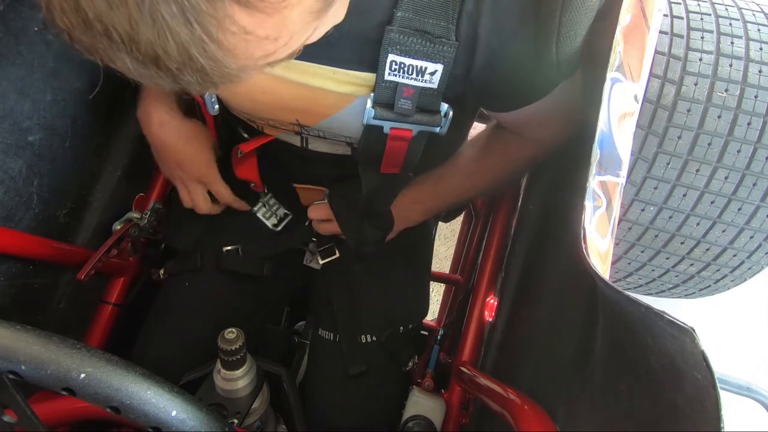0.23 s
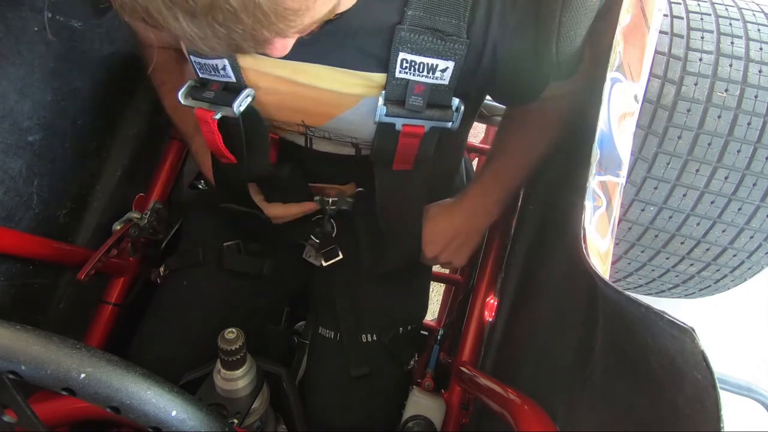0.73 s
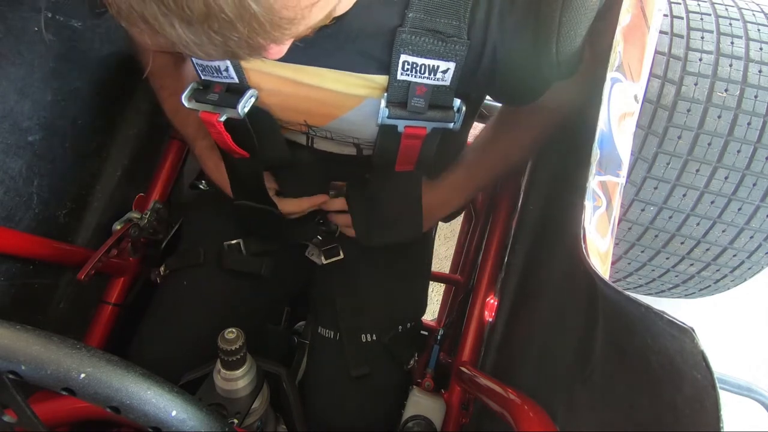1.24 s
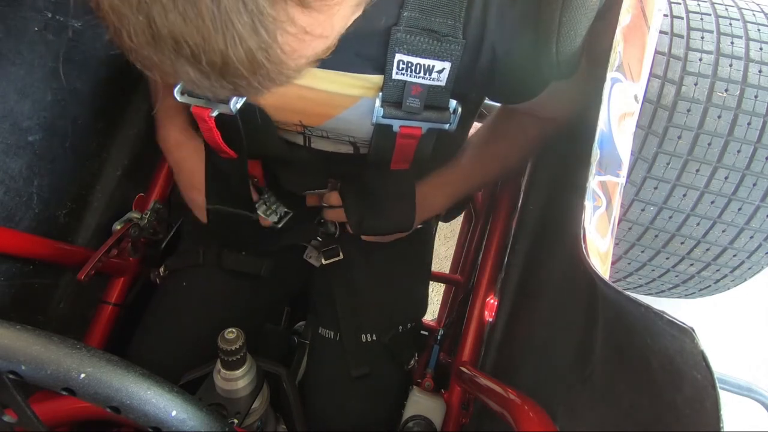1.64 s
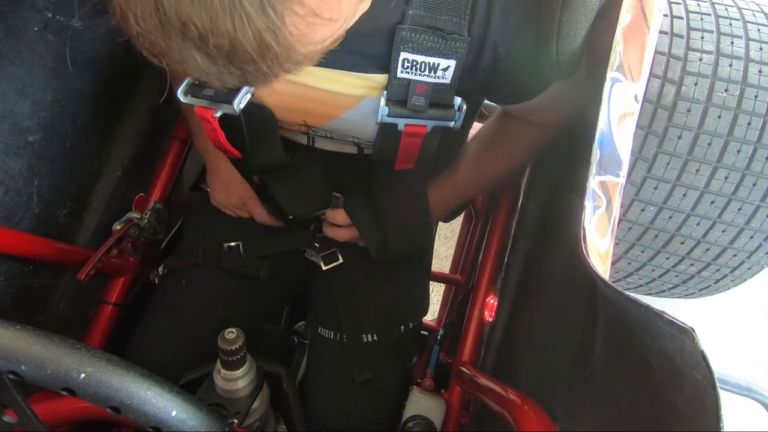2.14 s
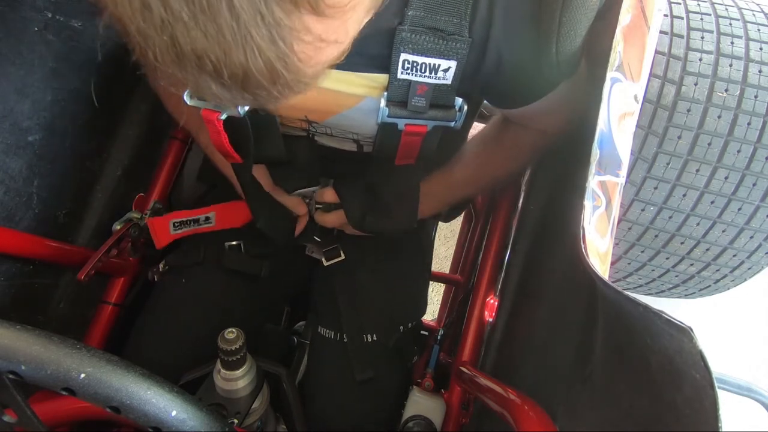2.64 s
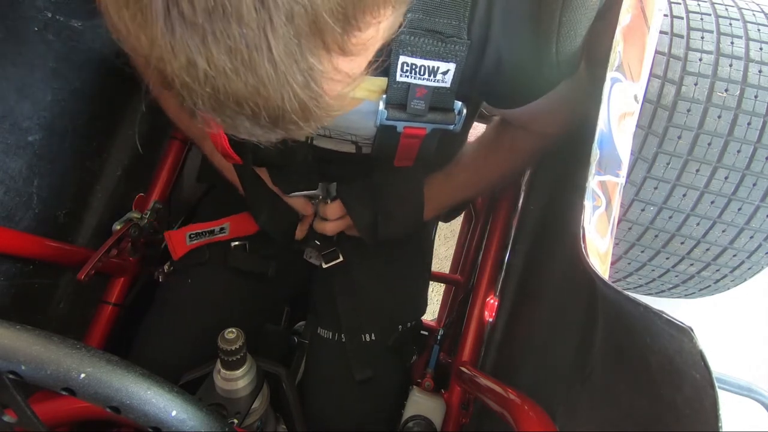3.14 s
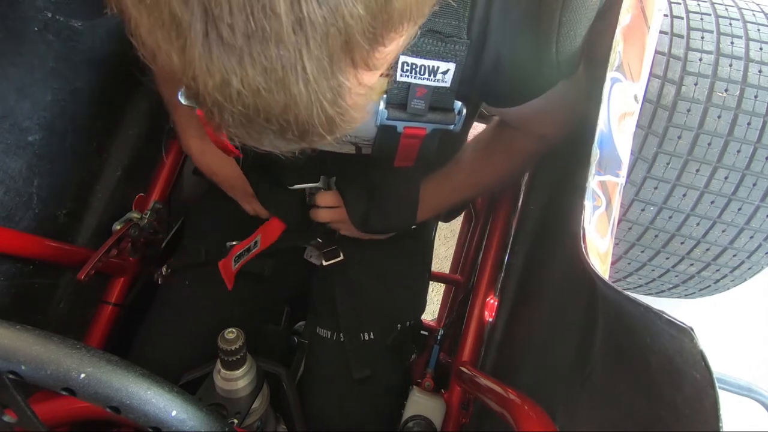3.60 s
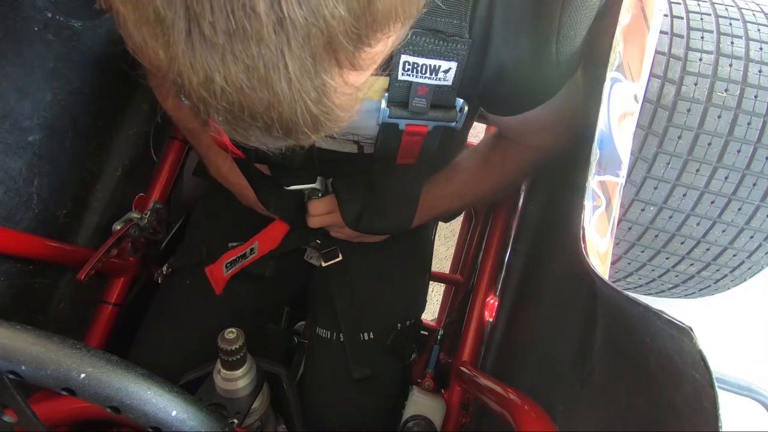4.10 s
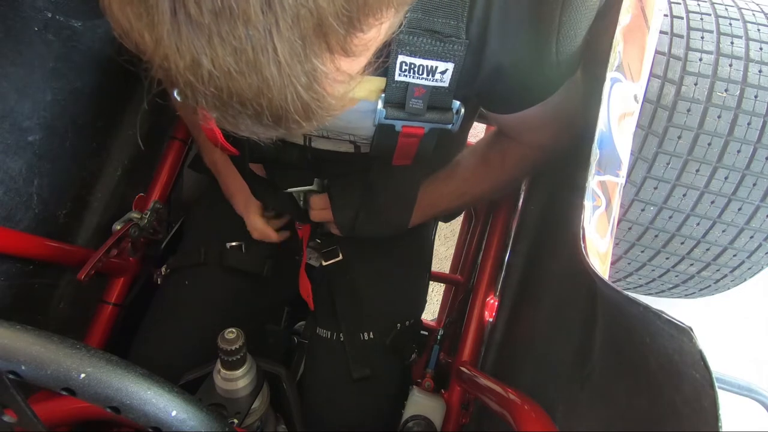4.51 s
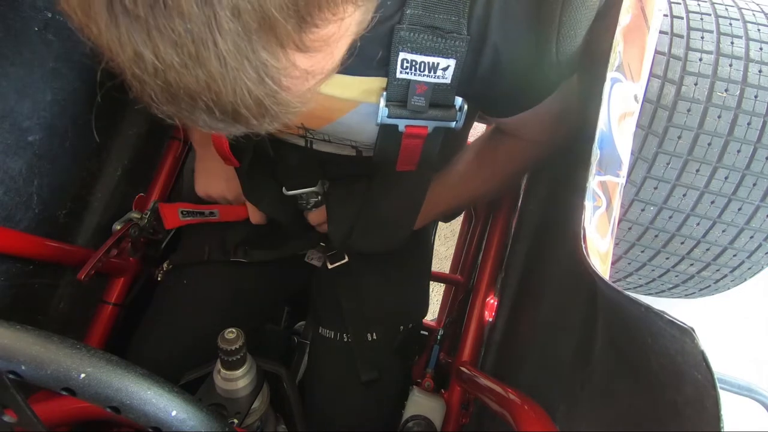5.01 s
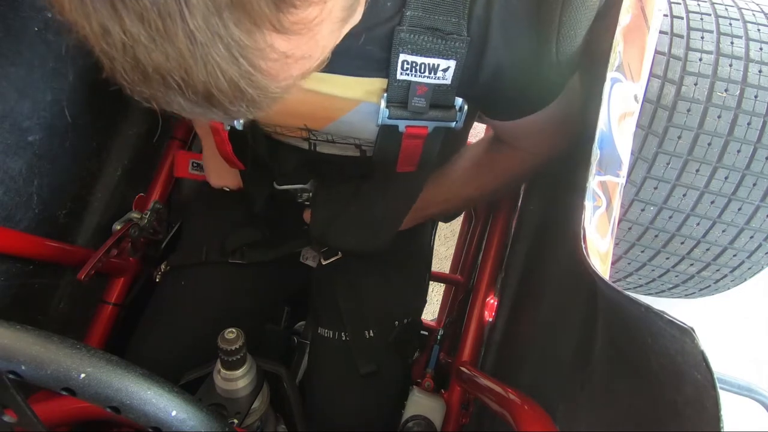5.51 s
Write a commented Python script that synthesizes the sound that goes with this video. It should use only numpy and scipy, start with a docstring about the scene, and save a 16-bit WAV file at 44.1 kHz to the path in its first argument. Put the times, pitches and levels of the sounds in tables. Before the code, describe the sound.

Light, quickly damped metal clicks and clinks come at uneven intervals as the steel ends of a seat harness are hooked into a buckle. Straps rustle against clothing in short pulls, with occasional dull thuds from the seat and a few tiny ticks, before the latch closes with one sharp snap. The microphone is close above the seat of an open buggy, with a faint steady rumble and hiss underneath.

```python
"""A racing harness is fastened in the open cockpit of a buggy, heard almost in mono from above the seat.
From the start, steel tongues and adjusters clink against the buckle, straps rub over clothes
and the seat takes a few dull knocks. Near the middle come tiny dry ticks and the hardest knocks.
At about 5.5 s the lever of the latch snaps shut. Faint air noise lies under it all."""
import sys
import numpy as np
from scipy import signal
from scipy.fft import rfft, irfft
from scipy.io import wavfile

SR = 44100
rng = np.random.default_rng(int(sys.argv[2]) if len(sys.argv) > 2 else 0)


def transcribe(u):
    """Save the signal u as a 16-bit wav file named by the first command-line argument.

    u: samples, shape (n,) or (channels, n), limited to [-1, 1]; the rate is SR.
    q: integer samples, one column per channel.
    """
    v = np.clip(np.atleast_2d(u).T, -1, 1)
    q = np.round(v * 32767).astype(np.int16)
    wavfile.write(sys.argv[1], SR, q)


N = 253575

# the tones (modes) at which the steel tongues and adjusters ring: f/Hz, level/dB
STEEL_TONES = [(800, -2), (1100, 1.5), (1260, -5), (1570, -3), (2340, -4), (3060, -2), (3480, -4.5),
               (3950, -1), (4750, -1), (5730, -4.5), (6280, -9), (7650, -4), (9090, -6.5), (11400, -7.5),
               (15350, -5)]
EDGES = np.geomspace(90, 17000, 21)   # borders of 20 noise bands, f/Hz
CENTRES = np.sqrt(EDGES[1:] * EDGES[:-1])
AGE = np.arange(SR // 3) / SR   # time since a hit, t/s
STEEL_MIDDLE_HZ = 2900   # the steel's sound is shaped around this pitch


def clinks(bands, hold_s=0.00095, clack_t60=0.037, ring_t60=0.042, linger_t60=0.5):
    """Hand-held steel hits steel: a short clack that holds briefly before it fades, and a quickly damped ring."""
    # t/s, clack level/dB, brightness/(dB per octave), louder part f/Hz, other part f/Hz, ring level/dB
    contacts = [(0.008, -42.5, 0.5, 6280, 9090, -47.5), (0.066, -51.5, -6, 2340, 6280, -52.5),
                (0.4691, -39, 0.2, 3950, 5700, -39.5), (0.839, -35, 4, 4750, 7650, -42),
                (0.864, -39.5, 2.3, 9090, 15350, -38), (0.943, -45, 2, 4750, 3950, -50),
                (1.3112, -47.5, 1, 4750, 2340, -52), (1.428, -58, 0, 1570, 1270, -54.5),
                (1.762, -49, -0.5, 1260, 3060, -55), (1.767, -42, 0.5, 5730, 11400, -50),
                (1.791, -47, 0.5, 1260, 6280, -55), (1.958, -48, -0.5, 6280, 3480, -47.5),
                (2.068, -49, 0, 3480, 2340, -53.5), (2.093, -52, 3, 6280, 3480, -55),
                (2.198, -50.5, 1, 2340, 3480, -66), (2.234, -50, -1.5, 3060, 2340, -38.5),
                (2.258, -49.5, 0, 800, 2340, -56), (2.3676, -53, 10.5, 7650, 4750, -60),
                (2.7053, -34, 2.5, 9090, 6280, -39.5), (2.712, -47, -6, 800, 1570, -42.5),
                (2.9794, -46.5, 2, 3950, 4750, -52), (3.007, -51, 1.5, 1570, 7650, -79),
                (3.0218, -48.5, -2, 3060, 3950, -57), (3.0347, -37.5, 2.5, 1260, 800, -45.5),
                (3.145, -58, 12, 7650, 9090, -57), (3.215, -62, -6, 1570, 7650, -60),
                (3.4409, -53, -4, 1570, 2340, -57.5), (3.49, -50.5, 6.5, 1570, 7650, -61),
                (3.547, -49.5, -5, 1570, 3370, -49), (3.5792, -39, 2.2, 2340, 800, -48.5),
                (4.143, -40.5, 0.1, 2340, 3950, -46.5), (4.368, -59.5, -3, 9090, 4750, -63.5),
                (4.43, -50.5, -5, 800, 6280, -57.5), (4.45, -56, -4.5, 3480, 1570, -59.5),
                (4.513, -42.5, -0.3, 7650, 3950, -50.5), (4.539, -49, 3, 1100, 1570, -57),
                (4.5452, -42, -3.5, 800, 2340, -56), (4.8742, -48.5, 2, 5730, 3950, -53.5),
                (5.101, -43, -2.5, 1100, 1570, -55), (5.231, -41, 1, 1100, 1570, -47),
                (5.482, -51.5, -5.5, 800, 1570, -54), (5.6215, -46.5, -2.5, 1260, 9090, -53)]
    # tone colour that all clacks share: f/Hz, level/dB
    clack_colour = [(150, -13.5), (550, 1), (1600, 5.5), (4000, -2), (8000, 0.5), (13000, -10.5),
                    (15500, -8)]
    colour = at_hz(CENTRES, *np.transpose(clack_colour)) - 1.5
    envelope = rise(0.00027) * held_fade(clack_t60, hold_s)
    tones = []
    for hz, _ in STEEL_TONES:
        linger = from_db(-22) / (1 + ((hz - 3950) / 490) ** 2)   # the hand barely damps tones near 3950 Hz
        tones.append(unit_blow(pressed_steel(hz, ring_t60)) + linger * ring(hz, linger_t60))
    tones = unit_blow(np.array(tones) * rise(0.00047))
    out = np.zeros(N)
    for s, db, brightness, louder_hz, other_hz, ring_db in contacts:
        top_hz = 10000 * 2 ** ((db + 40.5) / 24)   # a harder hit is shorter, so it reaches higher
        softness = -10 * np.log10(1 + (CENTRES / top_hz) ** 6)
        uneven = 3 * rng.standard_normal(len(CENTRES))   # no two hits land on the same spot
        tilt = brightness * np.log2(CENTRES / STEEL_MIDDLE_HZ)
        add(out, s, burst(bands, colour + db + softness + uneven + tilt, envelope))
        add(out, s, from_db(ring_db) * steel_ring(tones, louder_hz, other_hz))
    return out


def steel_ring(tones, louder_hz, other_hz, fall_db_per_octave=36):
    """Each of the two parts rings most near its own pitch; the remaining tones answer weakly."""
    hz, db = np.transpose(STEEL_TONES)
    louder = -fall_db_per_octave * np.abs(np.log2(hz / louder_hz))
    other = -3 - fall_db_per_octave * np.abs(np.log2(hz / other_hz))
    rest = -17 - 3 * np.abs(np.log2(hz / STEEL_MIDDLE_HZ))
    gains = from_db(db + np.max([louder, other, rest], axis=0))
    return (gains * rng.choice([-1, 1], len(hz))) @ tones


def pressed_steel(hz, t60, neighbour_db=-10):
    """Steel pressed against steel: one tone with a weaker neighbour on either side."""
    below, above = hz + np.array([-130, 130]) * rng.uniform(0.9, 1.22, 2)
    return ring(hz, t60) + from_db(neighbour_db) * (ring(below, t60) + ring(above, t60))


def latch(bands, snap_s=5.5208):
    """The lever scrapes over its catch and snaps home; the buckle rings and the straps shiver."""
    # tone colour of the crack: f/Hz, level/dB
    crack_colour = [(110, -16), (200, -8), (300, -23), (410, -8), (560, -30), (800, -18.5), (1500, -18),
                    (3000, -15.5), (5000, -16), (8500, -12), (12000, -20), (15000, -24)]
    # the tones at which the buckle rings: f/Hz, level/dB
    buckle_tones = [(438, -6), (790, -3), (1238, -5), (1750, -10), (2331, -10), (2772, -9), (3182, -6),
                    (3429, -6), (4366, -5), (5028, -9), (5690, -6), (5895, -6), (6072, -7), (6363, -8),
                    (6944, -5), (8172, 0), (8570, -1), (8818, -3), (10067, -5), (10589, -10), (11025, -9),
                    (11456, -7), (11919, -7), (13076, -8), (13722, -8), (14320, -13), (15326, -14),
                    (15638, -15)]
    colour = at_hz(CENTRES, *np.transpose(crack_colour))
    slide = burst(bands, colour - 12, fade(t60=0.01)[::-1])   # a backwards fade swells into the snap
    crack = burst(bands, colour, held_fade(t60=0.034, hold_s=0.00092))
    shiver = burst(bands, colour - 20 - np.log2(CENTRES / 1000), fade(t60=0.31))
    out = np.zeros(N)
    add(out, snap_s - AGE[-1], slide)
    add(out, snap_s, crack + shiver)
    for hz, db in buckle_tones:
        t60 = 0.042 * (hz / 3000) ** -0.18   # the hand damps high tones first
        late_s = rng.uniform(0, 0.0014)   # the parts meet a moment apart
        add(out, snap_s + late_s, from_db(db - 27) * ring(hz, t60))
    out = filtered(out, 280, "high")   # little of the snap reaches below 280 Hz
    add(out, snap_s, from_db(-49) * ring(hz=62, t60=0.7))   # the jolt runs down the straps into the frame
    return out


def seat_knocks(bands, rise_cycles=0.24):
    """The seat thuds when knocked: its low notes build more slowly and last longer."""
    # dull knocks: t/s, level/dB, brightness/(dB per octave)
    knocks = [(0.132, -37.5, -5.5), (0.212, -47, 2), (0.225, -52.5, -11.5), (2.566, -34, 0.5),
              (2.708, -32.5, 0), (4.248, -36, -1.5), (5.127, -38, -5.5), (5.522, -46, -8.5)]
    # how the seat answers a knock: f/Hz, level/dB, time to fade by 60 dB/s
    seat = [(99, 1, 1), (208, 4, 0.58), (456, 9.5, 0.24), (716, 4.5, 0.18), (1570, -1, 0.07),
            (4020, -14, 0.021), (9000, -31, 0.03)]
    hz, db, t60 = np.transpose(seat)
    colour, band_t60s = at_hz(CENTRES, hz, db), at_hz(CENTRES, hz, t60)
    envelopes = np.array([rise(rise_cycles / f) * fade(t) for f, t in zip(CENTRES, band_t60s)])
    out = np.zeros(N)
    for s, level_db, brightness in knocks:
        add(out, s, burst(bands, level_db + colour + brightness * np.log2(CENTRES / 450), envelopes))
    return out


def strap_rubbing(snags_per_s=45, sheen_hz=8500):
    """Strap fibres catch and slip on clothes in tiny grains, now and then with a snag."""
    # how the hollows of the cockpit colour the rubbing: f/Hz, level/dB
    cockpit_colour = [(120, -7.5), (300, -4), (600, -3.5), (1000, -2), (1800, 0), (3000, -0.5),
                      (5000, -1.5), (8500, -4.5), (11000, -5.5), (15000, -7)]
    snagged = rng.random(N) < snags_per_s / SR
    snags = 0.82 * snagged * np.minimum(rng.exponential(1, N), 2)
    friction = from_db(drift(1500)) + signal.fftconvolve(snags, fade(t60=0.0092))[:N]
    grains = rng.standard_normal((2, N)) * friction
    grains /= grains.std()
    # a narrow peak near 8500 Hz adds a thin sheen to the rubbing
    grains += 0.99 * signal.lfilter(*signal.iirpeak(sheen_hz, 9, fs=SR), grains)
    stutter_db = 0.73 * drift(70)   # the straps move unevenly
    out = np.zeros(N)
    for hz, band in zip(CENTRES, split(grains)):
        colour_db = at_hz(hz, *np.transpose(cockpit_colour)) - 1.5
        flicker_db = 2.5 * drift(40)   # each band also flickers on its own
        out += band * rub_strength(hz) * from_db(colour_db + stutter_db + flicker_db)
    return out


def rub_strength(hz):
    """How loud the cloth is in one band: each pull swells and fades over the slow shifting of the body."""
    # pulls on the straps: start t/s, length/s, level/dB, brightness/(dB per octave)
    pulls = [(-0.05, 0.18, -52, 0), (0.078, 0.26, -52, -4.5), (0.27, 0.31, -58.5, -1),
             (0.786, 0.15, -49.5, -5), (1.077, 0.15, -62, -8), (1.217, 0.16, -52.5, -2),
             (1.485, 0.2, -52, -4), (1.737, 0.17, -50.5, -3.5), (1.925, 0.049, -46, -2.5),
             (2.011, 0.15, -48, -1.5), (2.15, 0.16, -56, 0), (2.337, 0.085, -55.5, 5),
             (2.53, 0.23, -56, 2.5), (2.638, 0.22, -49, -4.5), (3.006, 0.12, -53.5, -3),
             (3.473, 0.24, -52.5, -3), (3.676, 0.27, -53.5, -0.5), (3.872, 0.17, -59.5, -1),
             (4.058, 0.14, -55.5, -4.5), (4.451, 0.11, -56, -8.5), (5, 0.25, -51.5, -3),
             (5.335, 0.083, -48.5, -3.5), (5.406, 0.3, -44.5, -4), (5.495, 0.44, -62, 3)]
    # rustle of the body shifting under the straps: t/s, level/dB
    shifting = [(0.0, -53.5), (0.27, -61), (0.64, -64), (1.25, -59.5), (3.44, -66), (3.59, -62),
                (4.42, -65.5), (4.82, -65), (5.62, -60), (5.75, -58.5)]
    t = np.arange(0, N, 100) / SR
    octaves = np.log2(np.clip(hz, 864, 9200) / 2610)   # distance from the middle of the rubbing's range
    rustle_db = np.interp(t, *np.transpose(shifting)) + 4 - 6 * octaves
    power = from_db(rustle_db) ** 2
    softness = 1 / (1 + (hz / 9700) ** 4)   # soft cloth gives little above 9700 Hz
    for start, length, db, brightness in pulls:
        progress = np.clip((t - start) / length, 0, 1)
        speed = np.abs(np.sin(np.pi * progress)) ** 0.93
        power += softness * (speed * from_db(db + brightness * octaves)) ** 2
    return np.interp(np.arange(N) / SR, t, np.sqrt(power))


def ticks(bands):
    """Tiny dry clicks: very short bursts of bright noise."""
    # t/s, level/dB
    clicks = [(2.426, -46), (2.457, -48.5), (2.4986, -41.5), (2.55, -43), (2.6225, -42), (2.8391, -44),
              (2.918, -58), (2.9984, -48), (3.072, -48), (3.479, -47), (4.272, -54)]
    colour = -12 + 4 * np.minimum(np.log2(CENTRES / 7000), 0)   # thinner below 7000 Hz
    out = np.zeros(N)
    for s, db in clicks:
        add(out, s, burst(bands, db + colour, fade(t60=0.017)))
    return out


def scrapes(width_hz=170):
    """A dragged steel fitting sings faintly: rubbing feeds one tone that swells and fades."""
    # start t/s, end t/s, f/Hz, level/dB
    drags = [(0.606, 0.767, 2380, -67), (1.444, 1.71, 2250, -67.5), (2.019, 2.147, 3430, -62),
             (2.621, 2.95, 2530, -72), (3.639, 3.904, 2610, -64), (5.339, 5.48, 2385, -64)]
    out = np.zeros(N)
    for start, end, hz, db in drags:
        stroke = np.sqrt(np.hanning(round((end - start) * SR)))
        resonance = signal.iirpeak(hz, hz / width_hz, fs=SR)
        song = signal.lfilter(*resonance, rng.standard_normal(SR))[:len(stroke)]
        add(out, start, from_db(db) * stroke * song / song.std())
    return out


def echo(x, t60=0.6, dull_hz=6000):
    """A weak, duller tail bounces back from the bodywork and what stands around it."""
    tail = rng.standard_normal(len(AGE)) * fade(t60) * rise(0.0071)
    tail = filtered(tail / np.linalg.norm(tail), dull_hz, "low", order=1)
    return from_db(-22) * signal.fftconvolve(x, tail)[:N]


def air(sway_db=-53):
    """A faint steady rumble and hiss over a slow sway of air pressure."""
    # still air around the buggy: f/Hz, level/dB
    air_colour = [(20, -50), (45, -39.5), (80, -48.5), (200, -54.5), (500, -55), (1200, -68), (3000, -71.5),
                  (8000, -69.5), (16000, -78)]
    hz = np.maximum(np.fft.rfftfreq(N, 1 / SR), 1)
    gains = from_db(at_hz(hz, *np.transpose(air_colour)))
    hiss = irfft(rfft(rng.standard_normal(N)) * gains, N)
    sway = filtered(rng.standard_normal(N), [3, 11], "band")
    return hiss + from_db(sway_db) * sway / sway.std()


def burst(bands, levels_db, envelope):
    """Countless close tones struck together: noise bands, each at its own level, follow the envelope."""
    start = rng.integers(len(AGE), N - len(AGE))
    share = np.sqrt(np.diff(EDGES) / (SR / 2))   # wider bands carry more energy
    return (from_db(levels_db) * share) @ unit_blow(bands[:, start:start + len(AGE)] * envelope)


def ring(hz, t60):
    """One fading tone of a struck part, at 0 dB."""
    return unit_blow(np.sin(2 * np.pi * hz * AGE) * fade(t60)) * rng.choice([-1, 1])


def rise(build_s):
    """A quick build-up from 0 towards 1."""
    return 1 - np.exp(-AGE / build_s)


def fade(t60):
    """A fade that loses 60 dB in t60 seconds."""
    return 1000 ** (-AGE / t60)


def held_fade(t60, hold_s):
    """A fade with a flat top for its first hold_s seconds."""
    return np.minimum(fade(t60), from_db(-60 * hold_s / t60))


def unit_blow(x):
    """Scale a hit so that its energy, spread over 10 ms, is at 0 dB."""
    return x * np.sqrt((SR // 100) / np.sum(x ** 2, axis=-1, keepdims=True))


def drift(rate):
    """A random wander that heads for a new value rate times a second."""
    targets = rng.standard_normal(N // 8)
    return np.interp(np.arange(N) * rate / SR, np.arange(len(targets)), targets)


def split(noises):
    """Cut two noises into bands, taking turns so that neighbours are unrelated."""
    return np.array([filtered(noises[k % 2], EDGES[k:k + 2], "band") for k in range(len(CENTRES))])


def filtered(x, hz, kind, order=2):
    """Keep the lows, the highs or one band of a sound."""
    return signal.sosfilt(signal.butter(order, hz, kind, fs=SR, output="sos"), x)


def at_hz(hz, known_hz, values):
    """Read between a table's rows, with every octave equally wide."""
    return np.interp(np.log(hz), np.log(known_hz), values)


def from_db(db):
    """Turn decibels into a gain."""
    return 10 ** (np.asarray(db) / 20)


def add(out, s, sound):
    """Mix a sound in at s seconds."""
    at = max(round(s * SR), 0)
    out[at:at + len(sound)] += sound[:N - at]


def scene(width_db=-37, width_delay_s=0.008):
    """All the sounds, centred between the ears; a faint late copy adds a trace of width."""
    bands = split(rng.standard_normal((2, N)))
    hits = clinks(bands) + ticks(bands) + seat_knocks(bands) + latch(bands)
    mono = hits + echo(hits) + strap_rubbing() + scrapes() + air()
    side = np.zeros(N)
    add(side, width_delay_s, from_db(width_db) * mono)
    return np.array([mono + side, mono - side])


def record(dry):
    """The treble above 15700 Hz is cut steeply."""
    return signal.sosfilt(signal.ellip(10, .1, 90, 15700, fs=SR, output="sos"), dry)


dry = scene()
out = record(dry)
transcribe(out)
```